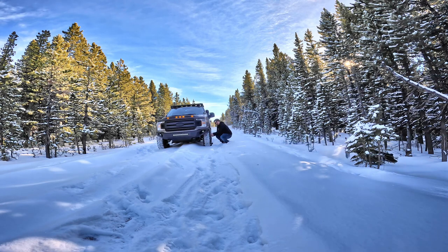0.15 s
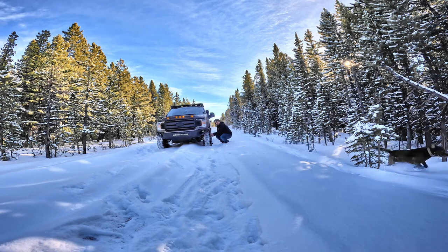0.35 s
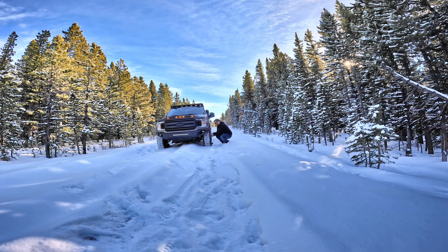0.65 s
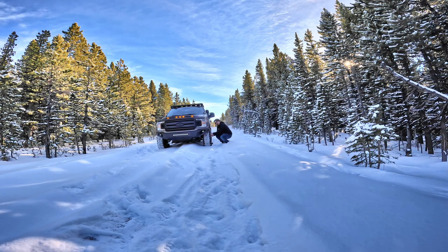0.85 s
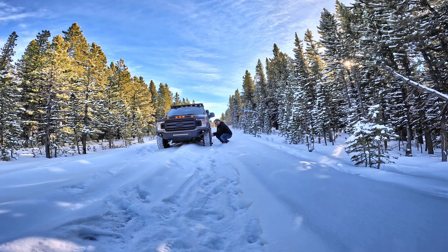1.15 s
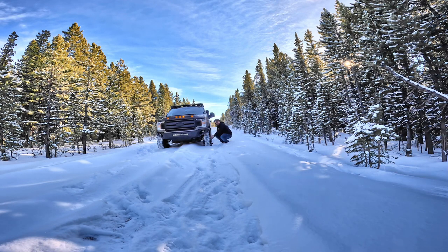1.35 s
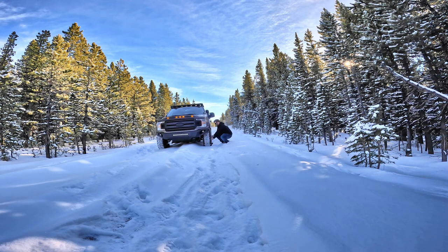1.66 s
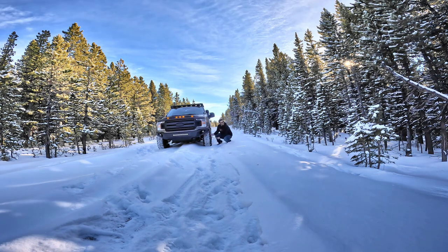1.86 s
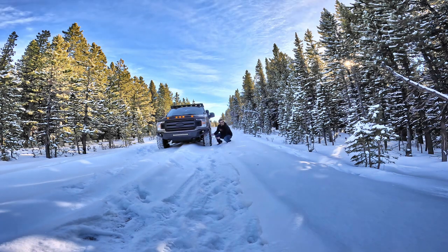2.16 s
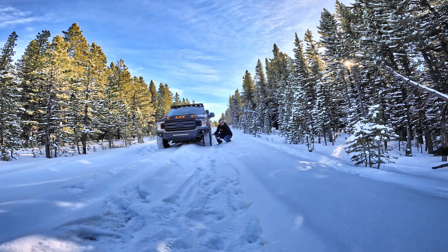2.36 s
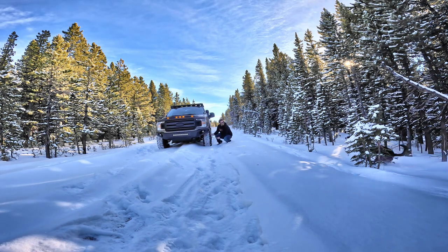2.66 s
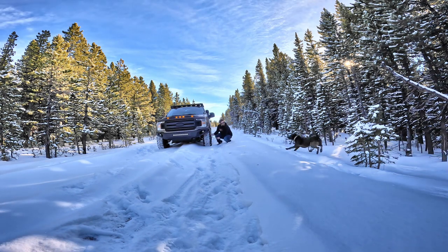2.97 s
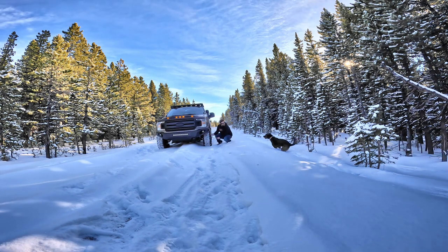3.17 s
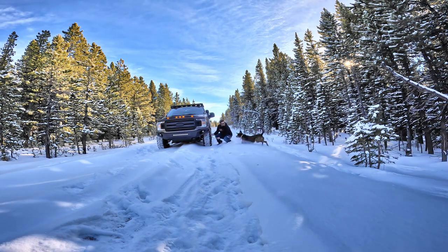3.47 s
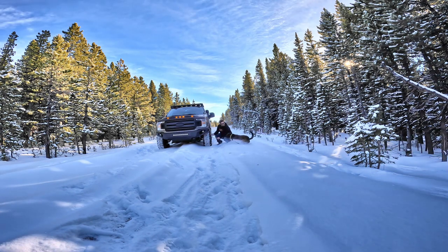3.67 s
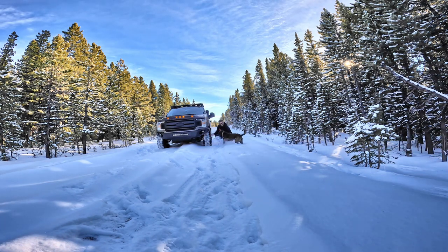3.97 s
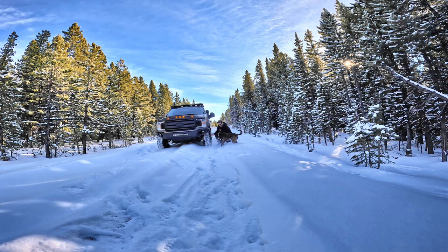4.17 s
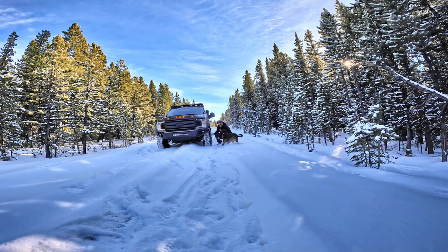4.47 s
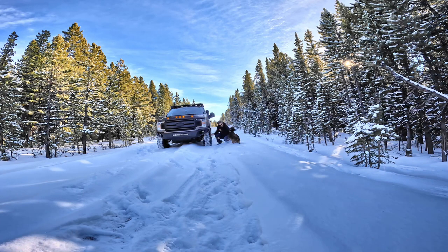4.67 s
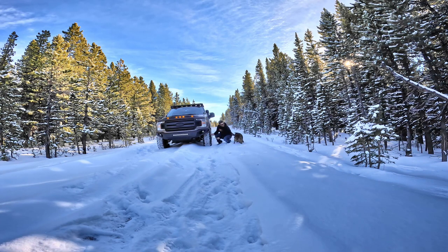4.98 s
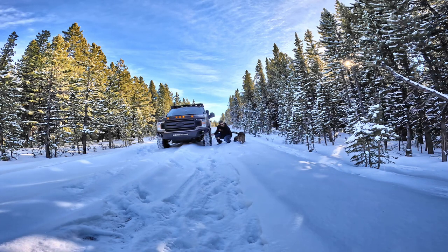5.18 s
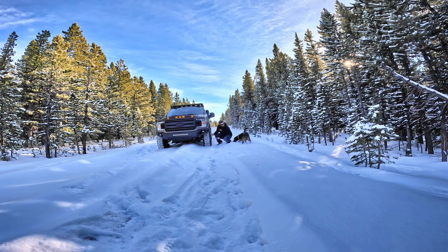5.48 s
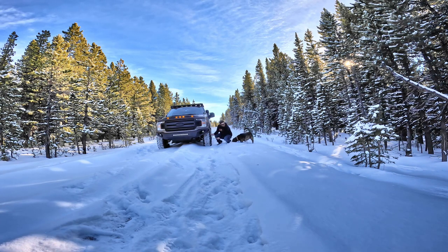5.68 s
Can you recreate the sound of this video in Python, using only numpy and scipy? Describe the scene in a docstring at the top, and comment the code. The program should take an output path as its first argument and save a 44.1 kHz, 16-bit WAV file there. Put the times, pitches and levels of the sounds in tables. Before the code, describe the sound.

On a quiet snowy forest track a pickup idles as a low, wavering hum under soft rush. A dog moves at the right: muffled landings, crunching paws, tinkling collar tags, then sharp twig snaps. Just before two seconds a tire valve opens abruptly and bright air hisses steadily to the end, over a few more snow crunches. Stereo microphone, some distance away, faint scattered tree echo.

```python
"""A pickup idles on a snowy forest track: its engine is a low, wavering hum over a soft rush of noise.
From the start a dog bounds about on the right: paws crunch as bursts of noise over a faint rustle of snow,
landings thud as short low tones and collar tags jingle as ringing sines with ticks. Twigs snap as noise
cracks with brief rings of the branch. At 1.8 s someone crouching at the wheel opens the tire valve: air
hisses out to the end as noise shaped by narrow passages, while the dog's steps go on until about 4.7 s."""
import sys
import numpy as np
from scipy import signal
from scipy.fft import rfft, irfft, next_fast_len
from scipy.io import wavfile
from scipy.ndimage import map_coordinates

SR = 44100
rng = np.random.default_rng(int(sys.argv[2]) if len(sys.argv) > 2 else 0)


def transcribe(signal):
    """Save signal, clipped to [-1, 1], as a 16-bit WAV file at the path in sys.argv[1]."""
    frames = np.atleast_2d(signal).T
    limited = np.clip(frames, -1, 1)
    pcm = np.round(limited * 32767).astype(np.int16)
    wavfile.write(sys.argv[1], SR, pcm)


N = 257103
TIME = np.arange(N) / SR
TOP_HZ = 15750  # nothing sounds above this

# Steady rush of engine bay and woods: [f/Hz, relative level per Hz/dB]
AMBIENT_SPECTRUM = [(100, -3), (300, -1.5), (550, 2), (850, -5.5), (1200, 1.5), (2500, -2.5), (3500, -8),
                    (6000, -10), (10000, -19), (13000, -30), (16000, -47)]
# Dull rumble under the engine hum: [f/Hz, relative level per Hz/dB]
RUMBLE_SPECTRUM = [(15, -2), (30, 7), (50, 1), (85, 2.5), (120, -8.5), (160, -14), (230, -23.5), (400, -41),
                   (1000, -82)]
# Uneven level of the low hum near 65 Hz, which swells and dips, before its trim: [t/s, level/dB]
HUM_LEVEL = [(0.0, -53), (1.95, -52), (2.06, -42.5), (2.11, -58), (2.26, -45), (2.39, -69), (2.53, -52),
             (3.86, -46), (4.03, -61.5), (4.11, -49), (5.65, -53.5), (5.75, -46), (5.83, -57)]
# Heavy landings of the dog: [start t/s, relative level/dB, pitch f/Hz]
LANDINGS = [(.29, -49.5, 139), (0.346, -49.5, 168), (0.762, -46, 97), (.87, -52, 129.5),
            (2.154, -51.5, 156.7), (2.795, -47.5, 124)]
# Noise bursts of paws in snow; the first is the broad tick of the tags' first touch:
# [t/s at the height of the burst, level/dB, width of the swell t/s, main pitch f/Hz,
# fizz relative to crunch level/dB]
SNOW_BURSTS = [(.075, -58, 0.0091, 2200, -0.5), (.285, -61.5, 0.015, 1300, -13),
               (.345, -56.5, .019, 2600, -0.5), (0.38, -51, .018, 1150, -4),
               (0.433, -53.5, 0.021, 1260, -10.5), (.505, -60.5, .03, 1350, -14),
               (.775, -56, .035, 1400, -8), (0.885, -56.5, .016, 1210, -13),
               (1.178, -58.5, 0.067, 1640, -4.5), (1.355, -57.5, 0.051, 1900, -7.5),
               (1.601, -58, 0.067, 1550, -0.5), (2.176, -58.5, 0.033, 900, -4),
               (2.338, -51.5, 0.042, 1290, -5), (2.722, -46.5, .021, 1140, -12.5),
               (3.289, -45.5, 0.026, 1190, -4), (4.109, -49.5, 0.048, 1590, -7.5),
               (4.216, -53, 0.016, 830, -12), (4.421, -58, .09, 2060, -39),
               (4.652, -54.5, 0.036, 1450, -11)]
# Fizz of fine snow crystals: [f/Hz, relative level per Hz/dB]
FIZZ_SPECTRUM = [(300, -10), (1500, 0), (3000, 4), (6500, 0), (10000, -8.5), (15000, -38)]
# Collar tags swinging together: [first touch t/s, relative level/dB, favoured pitch f/Hz]
TAG_SWINGS = [(.0745, -38.5, 9000), (.125, -42, 9800), (.525, -55, 9300), (.683, -41.5, 8800),
              (.7337, -51, 9600), (.7756, -42.5, 8650), (.9782, -53, 8300), (1.0196, -37.5, 8700),
              (1.067, -40, 9600), (1.1687, -53, 9100)]
# Ringing tones of the tags: [f/Hz, relative level/dB, time to fall by 60 dB t/s]
TAG_MODES = [(7100, -9, 0.032), (8280, -6.5, 0.057), (8600, -7.5, 0.037), (9290, 0, 0.029),
             (9560, -10, 0.06), (9900, -8, 0.027), (12140, -10, .04)]
# Breaking twigs: [t/s, relative level/dB, ring of the branch relative level/dB]
TWIG_SNAPS = [(0.787, -39, -13), (.819, -43.5, -18), (0.8777, -49, 5), (1.4921, -29, -7.5),
              (1.6013, -34, 5.5), (1.6815, -39.5, -3), (1.6883, -37.5, -1)]
# Tone colour of breaking wood: [f/Hz, relative level per Hz/dB]
TWIG_SPECTRUM = [(200, -22), (700, -12), (1100, -3), (2000, 6.5), (3200, 4.5), (4100, 0), (5200, 4),
                 (8000, 2), (10000, -2.5), (12500, -17), (15500, -24)]
# Ringing tones of the branch: [f/Hz, relative level/dB, time to fall by 60 dB t/s]
BRANCH_MODES = [(624, -10.5, 0.039), (1070, -5.5, 0.048), (1385, -3.5, .04), (1940, -1.5, 0.038),
                (2700, -14, 0.027), (4100, 2, 0.018)]
# Air flow from the valve, before its flutter: [t/s, level/dB]
AIR_FLOW = [(1.83, -40), (1.9, -39.5), (1.98, -40), (4.66, -40), (5.8, -41)]
# Turbulence of the air jet: [f/Hz, relative level per Hz/dB]
JET_SPECTRUM = [(300, -20), (850, -14.5), (1200, -4.5), (2100, 0.17), (3400, -3.5), (4300, 0.0),
                (6000, -3.5), (8000, -3), (10200, -2.5), (11000, -2.5), (12700, -5.5), (13300, -11),
                (14700, -17), (15600, -41)]
# Resonances and one notch of valve stem and deflator: [centre f/Hz, width f/Hz, lift level/dB]
VALVE_RESONANCES = [(4030, 80, 3.5), (4480, 250, 4), (5080, 370, 4.5), (5510, 280, 5.5), (6240, 220, 3.5),
                    (6670, 390, 8), (7054, 266, 11), (7450, 263, 11.5), (7710, 343, 10), (8305, 450.0, 7),
                    (8680, 340, 9), (9000, 220.0, 0), (9410, 320, 10.5), (9840, 160.0, 3),
                    (10140, 380, 7.5), (11050, 140.0, -4), (11000, 220.0, 1.5), (11430, 340, 6)]
# How much stronger the jet is on the left than on the right: [f/Hz, level/dB]
JET_LEFT_RIGHT = [(1000, -1.5), (3000, -1), (5000, 0), (7500, 0), (8700, 2), (10000, 2), (11500, 3.5),
                  (12700, 7.5), (14500, -6)]
# Likeness of the jet on the two sides: [f/Hz, likeness where 1 means identical]
JET_LIKENESS = [(1000, 0.92), (3000, 0.77), (7000, 0.95), (10000, 1), (12500, 0.41), (15000, 0.56)]

HUM_HZ = 64.6
HALF_ORDER_DB, HALF_ORDER_SWING_DB = -52, 2  # uneven cylinders sound an octave below the hum
SETTLE_DB_PER_S = 1.5  # that lower note fades as the idle settles
SHARPNESS, SHARPER_PER_DB = 0.47, 0.12  # the less a burst fizzes, the more hollow and pitched its crunch
CRUST_LEAD_S = .004  # the crust fizzes just before the snow below packs
RUSTLE_DB, RUSTLE_SWING_DB, RUSTLE_HZ = -73, 4, 1910  # faint, randomly swelling rustle of snow throughout
REBOUND_S, REBOUND_SCATTER, REBOUND_LOSS_DB = 0.012, .25, 9  # tags part and touch again, weaker each time
SPLINTER_T60_S, SPLINTER_REF_DB, SPLINTER_DOUBLES_DB = 0.11, -35, 10  # louder breaks splinter for longer
SECOND_CRACK_S, SECOND_CRACK_DB = .033, -10  # the last fibres let go a moment later
OPEN_S = 1.8005  # the valve pin is pushed in


def amp(db):
    """Turns decibels into a gain."""
    return 10 ** (np.asarray(db) / 20)


def unit(x):
    """Scales a sound to an rms (average strength) of 1."""
    return x / np.sqrt(np.mean(x ** 2) + 1e-20)


def along(points, hz):
    """Reads (frequency, value) points at any frequency, on a log axis."""
    point_hz, values = np.transpose(points)
    return np.interp(np.log(hz + 1), np.log(point_hz + 1), values)


def curves(rows):
    """Gives one value per sample for each column after the time."""
    s, *columns = np.transpose(rows)
    return [np.interp(TIME, s, column) for column in columns]


def wobble(rate):
    """Draws a smooth random curve through `rate` random points a second."""
    return map_coordinates(rng.standard_normal(400), [TIME * rate], mode="mirror")


def filtered(x, response):
    """Strengthens or weakens each frequency of x as `response` says."""
    n = x.shape[-1]
    padded = next_fast_len(n + 8192)
    gain = response(np.fft.rfftfreq(padded, 1 / SR))
    return irfft(rfft(x, padded) * gain, padded)[..., :n]


def causal(spectrum, size=512):
    """Makes the sharpest click that has this spectrum, with nothing before its start."""
    gain = amp(along(spectrum, np.fft.rfftfreq(size, 1 / SR)))
    cepstrum = irfft(np.log(gain))
    # fold the mirrored half forward in time
    cepstrum[1:size // 2] *= 2
    cepstrum[size // 2 + 1:] = 0
    return irfft(np.exp(rfft(cepstrum)))


def rush(colour, alike):
    """Makes stereo noise of rms 1: colour gives dB by frequency, alike the likeness of the sides."""
    def mid_side_gain(hz):
        turn = np.arccos(np.clip(along(alike, hz), -1, 1)) / 2
        return amp(colour(hz)) * np.array([np.cos(turn), np.sin(turn)])

    mid, side = filtered(rng.standard_normal((2, N)), mid_side_gain)
    return unit(np.array([mid + side, mid - side]))


def add(track, s, sound):
    """Mixes a sound into a track from time s on."""
    start = round(s * SR)
    part = sound[max(-start, 0):N - start]
    track[max(start, 0):][:len(part)] += part


def modes(rows, t):
    """Rings one fading sine per row, with new strength and tuning at every blow."""
    hz, level_db, t60 = np.transpose(rows)[:, :, None]
    strength, detune, phase = rng.standard_normal((3, len(rows), 1))
    fade = amp(level_db + 2 * strength - 60 * t / t60)
    return fade * np.sin(2 * np.pi * (hz * (1 + 0.0057 * detune) * t + phase))


def ambient(level_db=-60.5):
    """The even rush of the engine bay and the woods, as steady stereo noise."""
    alike = [(300, 0.62), (1400, 0.69), (3000, 0.6), (15000, 0.59)]
    return amp(level_db) * rush(lambda hz: along(AMBIENT_SPECTRUM, hz), alike)


def engine(rumble_db=-52, overtone_db=-69, unsteady_db=0.5, hum_trim_db=-.5):
    """Low exhaust tones whose pitch wavers with a slightly hunting idle, over a dull rumble."""
    hum_db, = curves(HUM_LEVEL)
    phase = 2 * np.pi * np.cumsum(HUM_HZ * (1 + 0.0071 * wobble(4.02))) / SR
    half_db = HALF_ORDER_DB - SETTLE_DB_PER_S * TIME + HALF_ORDER_SWING_DB * wobble(4.15)
    # (multiple of the hum's pitch, level in dB)
    orders = [(.5, half_db), (1, hum_trim_db + hum_db), (2, overtone_db)]
    tones = np.zeros(N)
    for multiple, db in orders:
        strength = np.sqrt(2) * amp(db + unsteady_db * wobble(6.7))
        tones += strength * np.sin(multiple * phase)
    alike = [(30, 0.9), (60, .97), (130, 0.91), (290, 0.36)]
    rumble = rush(lambda hz: along(RUMBLE_SPECTRUM, hz), alike)
    return tones + amp(rumble_db) * rumble


def trees(x, t60=0.46):
    """Trunks scatter a thin, short echo, different on each side: fading noise smears the sound."""
    t = np.arange(SR // 2) / SR
    tail = rng.standard_normal((2, len(t))) * amp(-60 * t / t60)
    return signal.fftconvolve(x[None], tail / np.linalg.norm(tail[0]), axes=1)[:, :N]


def landings(rise_s=0.015, spread=0.61):
    """The dog's weight gives the snow pack a short, dull push: a low tone with soft noise."""
    track = np.zeros(N)
    t = np.arange(SR // 4) / SR
    push = t / rise_s * np.exp(1 - t / rise_s)
    for s, db, pitch_hz in LANDINGS:
        noise = rng.standard_normal(len(t))
        give = unit(filtered(noise, lambda hz: 1 / (1 + (hz / (2 * pitch_hz)) ** 2) ** 2))
        tone = np.sin(2 * np.pi * pitch_hz * t)
        add(track, s, amp(db) * push * (tone + spread * give))
    return track


def hollow(x, pitch_hz, sharpness):
    """Packing snow sounds around one main pitch; the result has rms 1."""
    def resonance(hz):
        off_pitch = hz / pitch_hz - pitch_hz / (hz + 1)
        return 1 / (1 + 1j * sharpness * off_pitch) ** 2

    return unit(filtered(x, resonance))


def snow_bursts(grit=0.37):
    """Paws pack the snow in gritty swells, fizz first and a hollow crunch below; a tag tick is made alike."""
    # a faint rustle lies underneath, all through the scene
    rustle = hollow(rng.standard_normal(N), RUSTLE_HZ, sharpness=0.81)
    track = amp(RUSTLE_DB + RUSTLE_SWING_DB * wobble(14)) * rustle
    t = np.arange(-SR // 5, SR // 5) / SR
    for s, db, width_s, pitch_hz, fizz_db in SNOW_BURSTS:
        # uneven strength, held for 64 samples at a time, makes the noise gritty
        clumps = np.exp(grit * np.repeat(rng.standard_normal(len(t)), repeats=64)[:len(t)])
        fractures = clumps * rng.standard_normal((2, len(t)))
        crunch = hollow(fractures[0], pitch_hz, SHARPNESS * np.exp(-SHARPER_PER_DB * fizz_db))
        fizz = unit(filtered(fractures[1], lambda hz: amp(along(FIZZ_SPECTRUM, hz))))
        swell = amp(db) * np.exp(-.5 * (t / width_s) ** 2)
        add(track, s + t[0], swell * crunch)
        add(track, s + t[0] - CRUST_LEAD_S, amp(fizz_db) * swell * fizz)
    return track


def rebounds(swings, count=3):
    """Each swing gives a first touch and a few weaker ones at uneven gaps."""
    gaps = REBOUND_S * np.exp(REBOUND_SCATTER * rng.standard_normal((len(swings), count)))
    touches = []
    for (s, db, pitch_hz), gap in zip(swings, gaps):
        for k in range(count):
            touches.append((s + gap[:k].sum(), db - k * REBOUND_LOSS_DB, pitch_hz))
    return touches


def tags(ring_db=-5, tick_db=-5, tick_t60=0.019, reach_hz=800, scrape_s=0.001):
    """Small metal tags slide into each other; where they touch decides which tones ring most."""
    track = np.zeros(N)
    t = np.arange(SR // 5) / SR
    mode_hz = np.array(TAG_MODES)[:, 0]
    tick_spectrum = [(1000, -7), (5000, 7), (9000, 9), (15000, -5)]  # (Hz, relative dB)
    contact = 1 - np.exp(-t / scrape_s)  # sliding softens the start
    for s, db, pitch_hz in rebounds(TAG_SWINGS):
        favour = 1 / np.hypot(1, (mode_hz - pitch_hz) / reach_hz)
        ring = favour @ modes(TAG_MODES, t)
        tick = filtered(rng.standard_normal(len(t)), lambda hz: amp(along(tick_spectrum, hz)))
        tick_fade = amp(tick_db - 60 * t / tick_t60)
        add(track, s, amp(db + ring_db) * contact * (ring + tick_fade * tick))
    return track


def twigs(crack_db=-4.0, splinter_db=-15, crack_t60=0.007, ring_db=-14):
    """Dry wood cracks, sprays splintering fibres and cracks again more weakly; the branch rings briefly."""
    track = np.zeros(N)
    t = np.arange(SR // 5) / SR
    wood = causal(TWIG_SPECTRUM)
    wood = wood / np.linalg.norm(wood)
    for s, db, branch_db in TWIG_SNAPS:
        for delay_s, break_db in [(0, db), (SECOND_CRACK_S, db + SECOND_CRACK_DB)]:
            splinter_t60 = SPLINTER_T60_S * 2 ** ((break_db - SPLINTER_REF_DB) / SPLINTER_DOUBLES_DB)
            crack, fibres, sizes = rng.standard_normal((3, len(t)))
            splinters = unit(fibres * np.exp(.5 * sizes))
            force = amp(crack_db - 60 * t / crack_t60) * crack
            force += amp(splinter_db - 60 * t / splinter_t60) * splinters
            add(track, s + delay_s, amp(break_db) * np.convolve(force, wood))
        add(track, s, amp(db + branch_db + ring_db) * modes(BRANCH_MODES, t).sum(axis=0))
    return track


def wheel_echoes(x, strength=0.054, drift_rate=0.86, count=10):
    """Rim, hand and sleeve reflect the jet within a few ms; small movements vary the faint echoes."""
    echoes = np.zeros_like(x)
    for delay_s in rng.uniform(.001, .0043, count):
        echoes += strength * wobble(drift_rate) * np.roll(x, round(delay_s * SR), axis=1)
    return x + echoes


def valve_hiss(flutter_db=0.45, lag_s=.0000115):
    """The air jet starts at once and rings the narrow passages it leaves through."""
    flow_db, = curves(AIR_FLOW)

    def colour(hz):
        lifts = sum(db / (1 + (2 * (hz - centre) / width) ** 2) for centre, width, db in VALVE_RESONANCES)
        return along(JET_SPECTRUM, hz) + lifts

    jet = wheel_echoes(rush(colour, JET_LIKENESS))
    # the two sides get the treble at different strengths and a moment apart
    sides = np.array([[.5], [-.5]])

    def side_response(hz):
        lag = np.exp(-2j * np.pi * hz * lag_s * sides)
        return amp(sides * along(JET_LEFT_RIGHT, hz)) * lag

    jet = filtered(jet, side_response)
    opening = np.clip((TIME - OPEN_S) / .002, 0, 1)
    return jet * opening * amp(flow_db + flutter_db * wobble(25.1))


def scene(dog_pan_db=1.5, echo_db=-9):
    """Places truck and valve straight ahead, the dog off to the right."""
    dog = snow_bursts() + tags() + twigs()
    dog_pan = amp([[-dog_pan_db], [dog_pan_db]])
    beside = (dog + landings()) * dog_pan + amp(echo_db) * trees(dog)
    return valve_hiss() + engine() + ambient() * amp([[-.6], [.6]]) + beside


def record(dry):
    """Keeps nothing above the band limit."""
    return filtered(dry, lambda hz: hz < TOP_HZ)


dry = scene()
out = record(dry)
transcribe(out)
```